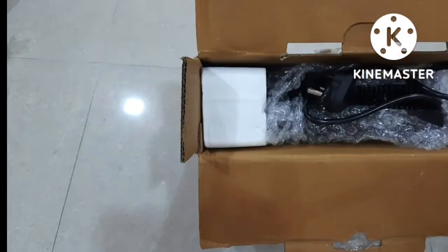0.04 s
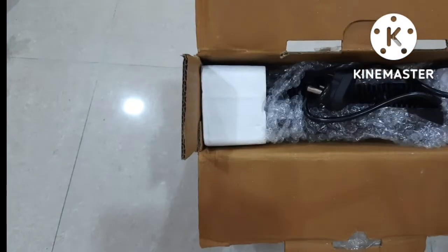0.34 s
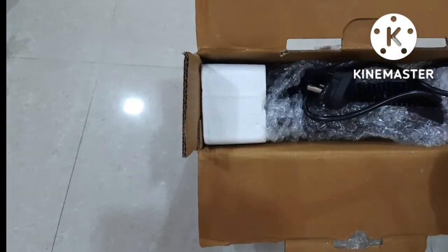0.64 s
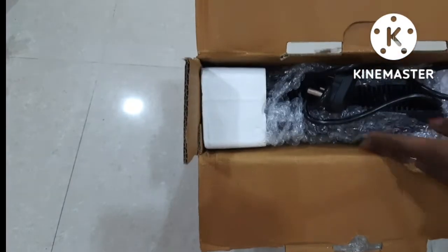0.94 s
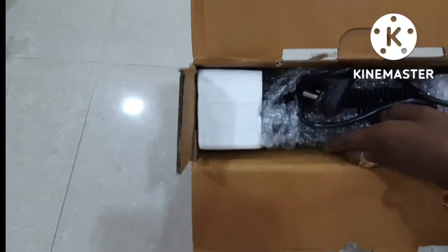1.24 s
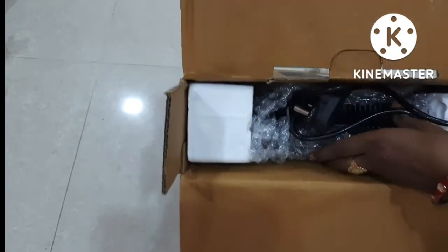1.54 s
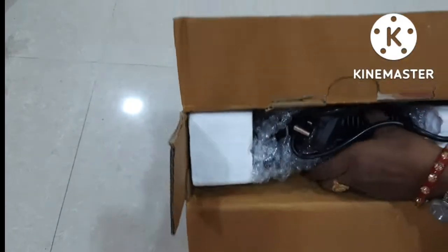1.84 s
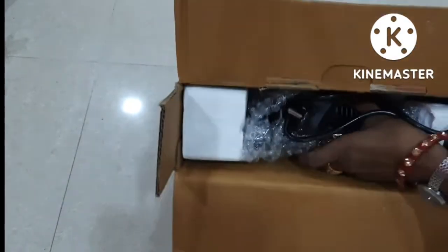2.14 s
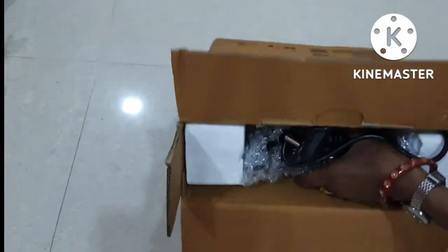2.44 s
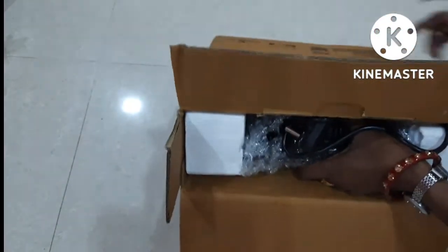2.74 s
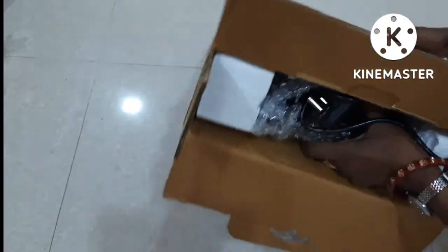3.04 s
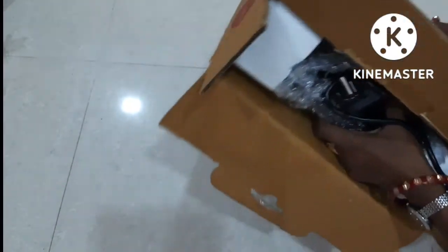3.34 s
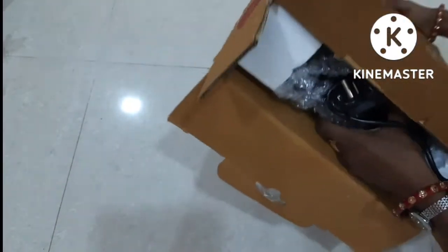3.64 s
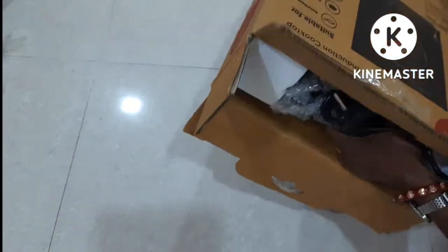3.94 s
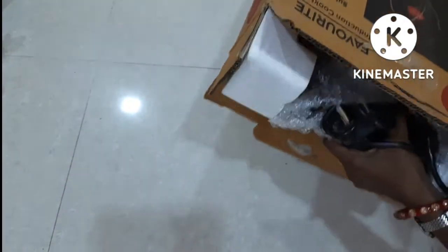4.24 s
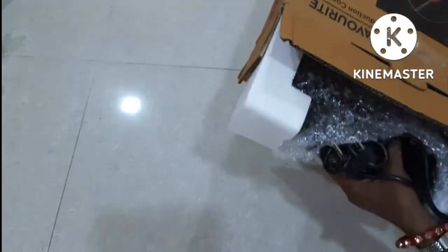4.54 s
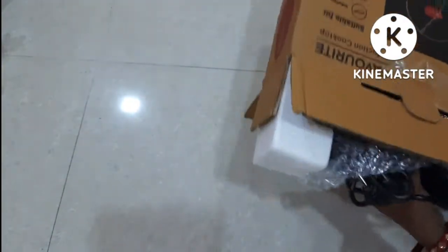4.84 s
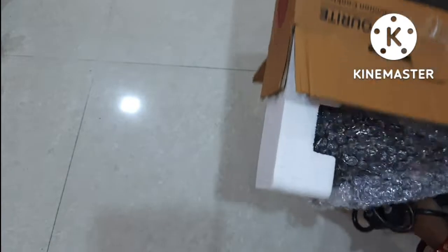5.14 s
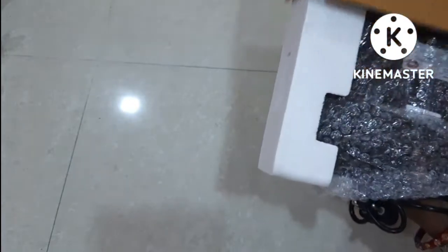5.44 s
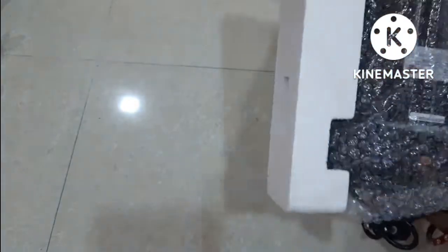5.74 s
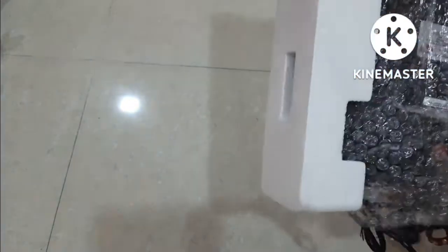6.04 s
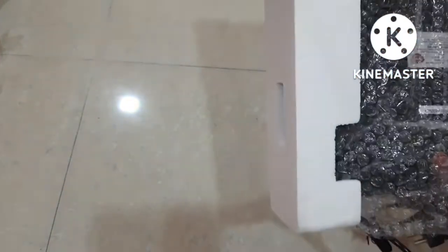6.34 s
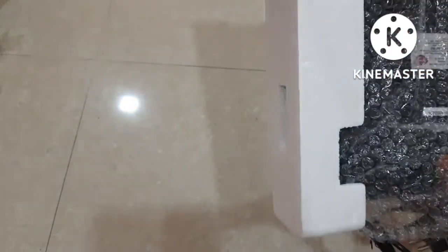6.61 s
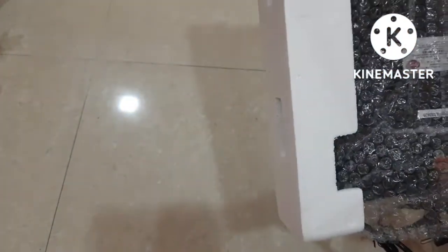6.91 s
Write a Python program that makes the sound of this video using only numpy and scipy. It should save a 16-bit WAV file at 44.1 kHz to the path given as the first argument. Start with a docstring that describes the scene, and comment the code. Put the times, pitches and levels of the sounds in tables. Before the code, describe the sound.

Bubble wrap crinkles in a creaking cardboard box, then foam packing scrapes out and a packed appliance thuds onto a tiled floor.

```python
"""Unboxing a cooktop

A hand digs into bubble wrap in a creaking cardboard box and tips the box over; creases buckle and snap.
A cooktop in foam end caps scrapes out in three pulls, the beads catching on the hollow walls, and comes
free with a hiss. It lands on floor tiles one end after the other, thudding and rattling its panels.
A phone hears it from close by, in a hard-walled room with a low hum."""
import sys
import numpy as np
from scipy import signal
from scipy.fft import rfft, irfft, next_fast_len
from scipy.io import wavfile

SR = 44100
rng = np.random.default_rng(int(sys.argv[2]) if len(sys.argv) > 2 else 0)


def inscribe(sig):
    """Save sig as 16-bit PCM at rate SR to the path in sys.argv[1].

    A 1-D sig is mono; a 2-D sig holds one channel per row.
    Samples are clipped to [-1, 1] before scaling.
    """
    pcm = np.round(np.clip(np.atleast_2d(sig).T, -1, 1) * 32767)
    wavfile.write(sys.argv[1], SR, pcm.astype(np.int16))


N = 316189
T = np.arange(N) / SR
PORT_LAG_S = 0.00019  # typical delay between the phone's two microphone ports

# tones in the room's hum: pitch_hz, rms_db
HUM_TONES = [(75.4, -61.5), (119, -58.5), (246, -66), (366, -66)]
# EQ of the hum's airy bed and of the microphone hiss: frequency_hz, gain_db
HUM_EQ = [(20, -57), (35, -12), (55, -5), (80, -3.5), (100, -5), (130, 3), (175, -4.5), (260, -5),
          (370, -6), (450, -14), (700, -19.5), (1100, -32), (2000, -41.5), (6000, -45.5)]
MIC_HISS_EQ = [(1000, -35), (2800, -6), (4000, -14), (5100, 5), (5750, 15.5), (6500, 4), (7600, 3),
               (8400, 13), (9500, -5), (16000, -56)]
# cardboard creaking under the hand: start_s, length_s, level_db, pitch_hz
CREAKS = [(0.15, 0.16, -70.5, 1430), (0.763, .04, -68, 1350), (0.892, 0.23, -53, 875),
          (2.595, 0.017, -51.5, 2100), (3.592, 0.07, -50.5, 1900), (3.935, 0.12, -50, 1100)]
# fader moves for the hand's steady work in the box: time_s, crinkle_db, rubbing_db
HAND = [(0.72, -87, -79), (0.79, -73, -74), (0.95, -58, -64), (1.11, -48.5, -49.5), (1.25, -57, -62),
        (1.5, -55, -58.5), (1.72, -52.5, -53), (2.0, -53, -56), (2.22, -57.5, -62), (2.41, -61, -61.5),
        (2.57, -57, -60.5), (2.73, -68, -73), (2.99, -75, -82), (3.16, -67, -69.5), (3.49, -69.5, -70),
        (3.68, -57.5, -54), (3.81, -64, -60), (3.95, -58, -56.5)]
# fingers closing on the wrap: tightest_grip_s, crinkle_db, rubbing_db
SQUEEZES = [(1.133, -45, -45), (1.25, -48, -48), (1.538, -46, -45.5), (1.712, -42, -51),
            (2.017, -39.5, -38.5), (2.228, -50.5, -51), (2.41, -47, -54.5), (2.46, -45.5, -55),
            (3.465, -55.5, -56), (3.635, -57, -52.5), (3.712, -50, -46), (3.77, -52, -53),
            (3.82, -52.5, -60)]
# wrap and box settling after a jolt: start_s, crinkle_db, rubbing_db
SETTLES = [(.728, -66, -73), (.918, -60, -58), (2.965, -63, -58.5), (3.19, -72, -63.5), (6.319, -43.5, -62),
           (6.485, -46, -62), (6.73, -52, -56), (6.86, -54.5, -55), (7.115, -67, -71)]
# EQ of fine crinkle, buckling wrap and the hand on cardboard: frequency_hz, gain_db
WRAP_EQ = [(500, -19), (1500, -5), (3000, 0), (4500, 2.5), (6500, 1), (8500, 1.5), (11000, 0), (13000, 3.5),
           (16000, -12)]
BUCKLE_EQ = [(1000, -10), (3000, -6.5), (6000, -7.5), (9000, -2), (13000, -11), (16000, -2)]
RUB_EQ = [(100, -2), (200, 9), (350, 7.5), (600, 4), (950, 3), (1500, 0), (2300, -2), (4000, -9.5),
          (9000, -20)]
# the sharpest snaps of wrap and cardboard: start_s, peak_db, pitch_hz, decay_cycles
SNAPS = [(0.737, -46, 7000, 1.1), (0.924, -36.5, 2500, 0.59), (0.994, -38, 4250, 4.6),
         (1.131, -31, 5030, 0.66), (1.385, -29.5, 8000, 0.42), (1.433, -32, 2760, 1.1),
         (1.507, -24, 12000, 1.2), (1.5181, -22, 9100, .45), (1.54, -29.5, 1040, 3),
         (1.584, -28, 11000, .6), (1.713, -24, 10200, .85), (1.967, -28, 6000, 0.25),
         (2.025, -27, 1400, .5), (2.218, -27, 10000, .6), (2.668, -32.5, 6030, 0.37),
         (2.704, -37, 3720, 1.5), (2.977, -58, 1510, 0.45), (3.451, -50, 3000, 0.42),
         (3.708, -23.5, 1200, .8), (3.722, -28, 10000, 1), (3.7528, -26, 4870, .25),
         (4.967, -26, 10000, .4), (5.759, -21.5, 519, 2.8), (6.333, -25, 1700, .9), (6.759, -32, 2470, .8)]
# hits on the packed cooktop: start_s, thud_db, centre_hz, contact_s, weight_db, rattle_db, crunch_db
KNOCKS = [(1.536, -39, 330, 0.002, -48, -43, -50), (1.691, -33, 184, 0.0018, -41, -45.5, -47),
          (1.893, -36, 244, .005, -48, -40, -50), (2.024, -28, 360, .0006, -51, -47, -48),
          (2.06, -22, 283, 0.0019, -34, -40, -46), (5.31, -31.5, 480, 0.0017, -52, -42, -52),
          (5.758, -25.5, 427, 0.0002, -24, -49, -42), (6.195, -38, 260, 0.0021, -58, -49, -53),
          (6.331, -14, 290, 0.0018, -15.5, -19.5, -32), (6.423, -23, 275, 0.005, -40, -42, -39),
          (6.505, -25.5, 340, 0.004, -50, -57, -34.5), (6.742, -15, 294, .009, -38, -32, -41),
          (6.758, -13.5, 326, 0.0028, -33, -16.5, -38), (6.785, -27, 560, .0028, -25, -20.5, -45),
          (6.898, -16, 224, 0.0026, -25, -30, -45.5), (7.03, -33.5, 167, .0034, -46, -61, -70)]
# ring of the packed cooktop and of its loose panels: pitch_hz, relative_db, t60_s
BODY_MODES = [(59.7, -19, 0.48), (78.9, -7, 0.33), (112, -4.5, 0.051), (135.2, 5, 0.091), (189, -2, 0.077),
              (218.4, 0.5, 0.12), (273.2, -4.5, 0.24), (298.3, 9.5, 0.053), (321, -8, 0.42),
              (348, 5, 0.038), (452.7, -3.5, 0.18), (590, -20, 0.062)]
PANEL_MODES = [(482, 4, 0.027), (584, 3, 0.069), (617, -4, 0.13), (652, -1, 0.16), (736, -1.5, 0.07),
               (800, -1, 0.087), (867, -2, 0.054), (1042, -9, 0.046), (1358, -13.5, 0.16)]
# EQ of crushed foam: frequency_hz, gain_db
CRUNCH_EQ = [(200, -2.5), (600, -1.5), (1200, -10), (1800, -5.5), (2400, -6.5), (3000, -9), (4500, -14.5),
             (7000, -21.5), (15000, -38)]
# foam on cardboard, three pulls and then small tugs:
# start_s, attack_s, hold_s, release_s, rasp_db, hiss_db
PULLS = [(3.95, .19, 0.37, 0.13, -35.5, -37.5), (4.692, .12, 0.023, 0.12, -36.5, -39.5),
         (4.992, 0.098, .53, 0.071, -36, -37.5), (5.624, 0.047, .03, 0.066, -50.5, -45.5),
         (5.735, .03, 0.044, 0.053, -50, -49), (6.028, 0.048, 0.045, 0.12, -52, -61)]
# the box's hollow note, rising as the cooktop leaves, and its low end: time_s, pitch_hz, rumble_db
HOLLOW = [(3.95, 1000, -10), (4.5, 1140, -14), (4.85, 1170, -11.5), (5.1, 1680, -20), (5.33, 1730, -13),
          (5.6, 1530, -5.5), (5.75, 1480, 6), (6.02, 1510, 0)]
# EQ of wall rasp, wall rumble, foam beads and the last foam edge: frequency_hz, gain_db
RASP_EQ = [(100, -13.5), (220, -10), (400, -1), (600, -4.5), (800, -3.5), (1000, -1), (1400, -3),
           (2000, -1.5), (2700, -4), (4000, -6.5), (7000, -12.5), (16000, -15.5)]
RUMBLE_EQ = [(40, -16), (80, -4.5), (130, 2), (200, -7), (300, 0.5), (420, -4.5), (650, -11.5), (2000, -41)]
BEAD_EQ = [(800, -13.5), (2500, -1), (4500, 0.5), (6000, 0.5), (7500, 0), (8600, 3), (10200, -1),
           (11800, 3), (13500, 1.5), (16000, -1.5)]
SLIP_EQ = [(500, -17), (1500, -16), (3300, -15), (4100, -8), (4800, -4), (6800, -6), (7500, -8), (8400, -5),
           (11300, -6), (12400, 3), (13000, 2), (13700, -3), (14800, 0)]
# the room's reverb: band_hz, t60_s, wet_db
REVERB_BANDS = [(60, 0.87, 0.5), (149, 0.91, -5), (305, 0.55, -4), (715, 0.55, -5.5), (2070, 0.48, -5),
                (4930, 0.42, -4), (14100, 0.21, -6.5)]


def amp(db):
    """Decibels to gain."""
    return np.exp(np.asarray(db) * (np.log(10) / 20))


def on_log(hz, points, values):
    """Straight lines on a log-frequency axis."""
    return np.interp(np.log(np.maximum(hz, 1)), np.log(points), values)


def convolve(x, response):
    """Both channels through an impulse response."""
    return signal.oaconvolve(x, np.atleast_2d(response), axes=1)[:, :N]


def eq(x, curve, size=4096):
    """Shape the tone with a minimum-phase filter of unit power."""
    gain = amp(on_log(np.fft.rfftfreq(size, 1 / SR), *np.transpose(curve)))
    cepstrum = irfft(np.log(gain))
    cepstrum[1:size // 2] *= 2
    cepstrum[size // 2 + 1:] = 0
    response = irfft(np.exp(rfft(cepstrum)))
    return convolve(x, response / np.linalg.norm(response))


def diffuse(count):
    """Noise from all sides: nearly mono in the bass, wide in the treble."""
    size = next_fast_len(count)
    mid, side = rfft(rng.standard_normal((2, size)))
    alike = 0.93 / (1 + (2 * np.pi * np.fft.rfftfreq(size, 1 / SR) * PORT_LAG_S) ** 2)
    mid, side = mid * np.sqrt((1 + alike) / 2), side * np.sqrt((1 - alike) / 2)
    return irfft(np.array([mid + side, mid - side]), size)[:, :count]


def drift(rate_hz):
    """A random modulator gliding between values, with a spread near 1."""
    knots = rng.standard_normal(4096)
    return np.interp(T * rate_hz, np.arange(len(knots)), knots)


def grains(per_s, spread_db):
    """A unit-power stream of tiny uneven slips, each reaching the two ports apart from its own spot."""
    count = int(per_s * N / SR)
    when, luck, spot = rng.random((count, 3)).T
    size = amp(spread_db * np.minimum(-np.log(1 - luck), 5)) * rng.choice([-1, 1], count)
    lag = -np.sign(spot - .5) * np.log(1 - np.abs(2 * spot - 1)) * PORT_LAG_S * SR
    out = np.array([np.bincount((when * N + delay).astype(int) % N, size, N) for delay in (0, lag)])
    return out / out.std()


def resonate(x, hz, width_hz):
    """A sweepable resonance; unit power for white input."""
    turn = np.exp(2j * np.pi * np.cumsum(hz) / SR)
    feedback = np.exp(-np.pi * width_hz / SR)
    return (turn * signal.lfilter([np.sqrt(2 * (1 - feedback ** 2))], [1, -feedback], x / turn)).real


def add(out, start_s, sound):
    """Drop a one-shot onto a track."""
    start = int(start_s * SR)
    out[:, start:start + sound.shape[-1]] += sound[..., :N - start]


def room_tone(hum_db=-52, hiss_db=-72):
    """A low hum, as of a ceiling fan, with wavering tones, and the microphone's faint hiss."""
    tones = 0
    for hz, db in HUM_TONES:
        level = np.sqrt(2) * amp(db + 2.3 * drift(2.97))
        tones += level * np.sin(2 * np.pi * hz * T + 1.22 * drift(5))
    air = eq(diffuse(N), HUM_EQ) * amp(hum_db + 0.59 * drift(4.3))
    return tones + air + eq(diffuse(N), MIC_HISS_EQ) * amp(hiss_db)


def creaks():
    """Cardboard sticks and slips in short runs that ring one patch of the wall."""
    level, pitch_hz = np.zeros(N), np.full(N, 1000.)
    for start_s, length_s, db, hz in CREAKS:
        run = (T > start_s) & (T < start_s + length_s)
        level[run] = amp(db) * np.sin(np.pi * (T[run] - start_s) / length_s)
        pitch_hz[run] = hz
    return resonate(grains(per_s=900, spread_db=-2), pitch_hz, width_hz=220) * level


def swell(start_s, attack_s, release_s):
    """Envelope of a flurry that builds up and dies away."""
    rise = np.clip((T - start_s) / attack_s, 0, 1) ** 2
    return rise * np.exp(-np.maximum(T - start_s - attack_s, 0) / release_s)


def hand_envelopes(squeeze_s=0.038):
    """Crinkle and rubbing gains: the hand's steady work, plus a flurry for each squeeze and jolt."""
    times, *faders = np.transpose(HAND)
    wrap_db, rub_db = (np.interp(T, times, db, left=-140, right=-140) for db in faders)
    wrap, rub = amp(wrap_db + 1.5), amp(rub_db + 1)
    flurries = [(swell(s - squeeze_s, squeeze_s, release_s=0.023), levels) for s, *levels in SQUEEZES]
    flurries += [(swell(s, attack_s=0.024, release_s=0.072), levels) for s, *levels in SETTLES]
    for shape, (crinkle_db, rubbing_db) in flurries:
        wrap = np.hypot(wrap, amp(crinkle_db) * shape)
        rub = np.hypot(rub, amp(rubbing_db) * shape)
    return wrap, rub


def rummage():
    """Bubble wrap buckles in flurries of clicks while the hand drags along the cardboard."""
    wrap_gain, rub_gain = hand_envelopes()
    fine = grains(per_s=6000, spread_db=2.5) * amp(3 * drift(60))
    buckles = grains(per_s=130, spread_db=3)
    crinkle = amp(-0.5) * eq(fine, WRAP_EQ) + amp(-3.5) * eq(buckles, BUCKLE_EQ)
    rubbing = eq(grains(per_s=2600, spread_db=2), RUB_EQ) * amp(2 + 2.1 * drift(35.54))
    return crinkle * wrap_gain + rubbing * rub_gain


def snaps(tail_db=-24, tail_s=0.0027, count=2048):
    """A crease gives way and rings for a few cycles, and the sheet around it crackles briefly."""
    out, t = np.zeros((2, N)), np.arange(count) / SR
    for start_s, peak_db, hz, cycles in SNAPS:
        push = amp(tail_db) * diffuse(count) * np.exp(-t / tail_s)
        push[0, 8] += 1  # the transient, up to a sample apart left and right
        push[1, 8 + rng.integers(-1, 2)] += 1
        pole = np.exp((2j * np.pi - 1 / cycles) * hz / SR)
        snap = signal.lfilter([1, 0, -1], [1, -2 * pole.real, abs(pole) ** 2], push)
        add(out, start_s, snap * amp(peak_db) / np.abs(snap).max())
    return out


def ring(modes, t):
    """The ring-out of each mode after a hit, one row a mode."""
    return np.array([amp(db) * np.sin(2 * np.pi * hz * t) * np.exp(-np.log(1000) * t / t60_s)
                     for hz, db, t60_s in modes])


def thud(t, centre_hz, contact_s, reach_octaves=0.61):
    """A soft, broad contact wakes the body's low modes, a corner the higher ones."""
    mode_hz = np.transpose(BODY_MODES)[0]
    reach = 1 / (1 + (np.log2(mode_hz / centre_hz) / reach_octaves) ** 2)
    swing = reach @ ring(BODY_MODES, t) * (1 - np.exp(-t / contact_s))
    return swing / np.abs(swing).max()


def knocks(sink_lag_s=0.00892, rattle_s=0.039, crunch_s=0.049, left_lag_s=0.0002):
    """Each hit rings the cooktop's body, shakes its loose panels and crushes a little foam."""
    thuds, shaking, crushing = np.zeros((3, 2, N))
    t = np.arange(32768) / SR
    # a low thump just after each contact, as the weight sinks into the foam
    weight = thud(t, centre_hz=116, contact_s=0.0018)
    for start_s, thud_db, centre_hz, contact_s, weight_db, rattle_db, crunch_db in KNOCKS:
        add(thuds, start_s, amp(thud_db) * thud(t, centre_hz, contact_s))
        add(thuds, start_s + sink_lag_s, amp(weight_db) * weight)
        add(shaking, start_s, amp(rattle_db) * np.exp(-t / rattle_s))
        add(crushing, start_s, amp(crunch_db) * np.exp(-t / crunch_s))
    panels = ring(PANEL_MODES, t).sum(axis=0)
    rattle = convolve(grains(per_s=1800, spread_db=-1) * shaking, panels / np.linalg.norm(panels))
    crunch = eq(grains(per_s=6000, spread_db=2.5) * crushing, CRUNCH_EQ)
    left, right = thuds + amp(-6.5) * rattle + amp(-3.5) * crunch
    # the cooktop sits to the right, so the left port hears it later
    return np.array([np.interp(T - left_lag_s, T, left), right])


def stroke(start_s, attack_s, hold_s, release_s):
    """The arm eases into a movement, keeps its speed and eases to a stop."""
    ramp = np.minimum((T - start_s) / attack_s, 1 - (T - start_s - attack_s - hold_s) / release_s)
    return np.sin(np.pi / 2 * np.clip(ramp, 0, 1)) ** 2


def pull_envelopes(sag_db_per_s=2.5, emerge_at_s=5.127, emerge_length_s=0.44, emerge_db=9.5):
    """Rasp and hiss gains follow the speed of each pull, which slackens as the arm extends."""
    rasp, hiss = 0, 0
    for start_s, attack_s, hold_s, release_s, rasp_db, hiss_db in PULLS:
        sag = amp(-sag_db_per_s * np.maximum(T - start_s - attack_s, 0))
        speed = stroke(start_s, attack_s, hold_s, release_s) * sag
        rasp += amp(rasp_db) * speed
        hiss += amp(hiss_db) * speed ** 1.8  # grows faster with speed than the rasp
    # the hiss opens up once the box no longer screens the foam
    exposed = np.clip((T - emerge_at_s) / emerge_length_s, 0, 1) ** 2
    hiss *= amp(emerge_db * exposed)
    # between pulls the foam still creeps
    creep = stroke(start_s=4, attack_s=0.01, hold_s=2, release_s=1.12)
    return np.hypot(rasp, amp(-60.5) * creep), np.hypot(hiss, amp(-55) * creep)


def foam_slide(overtone_ratio=1.51):
    """Foam beads catch and let go by the thousand: they hiss and make the hollow box rasp and rumble."""
    rasp_gain, hiss_gain = pull_envelopes()
    times, *curves = np.transpose(HOLLOW)
    hollow_hz, rumble_db = (np.interp(T, times, curve) for curve in curves)
    # the walls flex under the uneven grip, so their note wanders
    hollow_hz *= 1 + 0.065 * drift(22)
    grip = amp(0.47 * drift(140))
    walls = eq(grains(per_s=5500, spread_db=1.6), RASP_EQ) * amp(0.93)
    catches = grains(per_s=3000, spread_db=1.4)
    hollow = amp(-6.5) * resonate(catches, hollow_hz, width_hz=400)
    hollow += amp(-13) * resonate(catches, overtone_ratio * hollow_hz, width_hz=350)
    rumble = eq(catches, RUMBLE_EQ) * amp(rumble_db)
    hiss = eq(grains(per_s=16000, spread_db=1.5), BEAD_EQ) * amp(2)
    return grip * ((walls + hollow + rumble) * rasp_gain + hiss * hiss_gain)


def edge_slip(level_db=-24):
    """The last foam edge slips off with no wall to carry it: a thin, ragged hiss, almost a squeak."""
    envelope = amp(level_db) * stroke(start_s=6.05, attack_s=0.11, hold_s=0.012, release_s=0.046)
    slips = grains(per_s=15000, spread_db=1.5) * amp(0.98 * drift(160))
    return eq(slips, SLIP_EQ) * envelope


def reverb(x, predelay_s=0.0029, build_s=0.013, count=44100):
    """Tiles and bare walls add a dense tail that hangs longest in the bass."""
    t, hz = np.arange(count) / SR, np.fft.rfftfreq(count, 1 / SR)
    band_hz = np.transpose(REVERB_BANDS)[0]
    noise, response = rfft(diffuse(count)), 0
    onset = 1 - np.exp(-np.maximum(t - predelay_s, 0) / build_s)
    for (_, t60_s, wet_db), share in zip(REVERB_BANDS, np.eye(len(REVERB_BANDS))):
        fade = onset * np.exp(-np.log(1000) * t / t60_s)
        band = irfft(noise * on_log(hz, band_hz, share), count)
        response += amp(wet_db) * band * fade / np.linalg.norm(fade)
    return x + convolve(x, response)


def scene():
    """The mix: all the handling through the reverb, over a bed of room tone."""
    foley = rummage() + creaks() + foam_slide() + edge_slip() + snaps() + knocks()
    return reverb(foley) + room_tone()


def record(dry, low_cut_hz=38, high_cut_hz=15750):
    """The phone rolls off the sub bass and cuts the very top steeply."""
    low_cut = signal.butter(4, low_cut_hz, "high", fs=SR, output="sos")
    high_cut = signal.ellip(10, .2, 70, high_cut_hz, fs=SR, output="sos")
    return signal.sosfilt(high_cut, signal.sosfilt(low_cut, dry))


dry = scene()
out = record(dry)
inscribe(out)
```